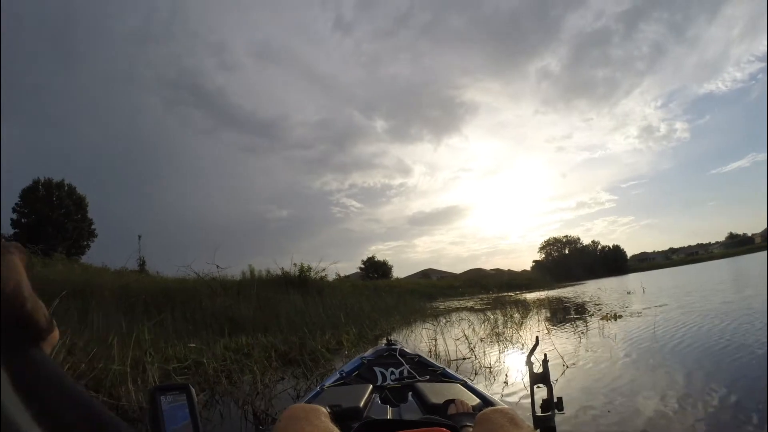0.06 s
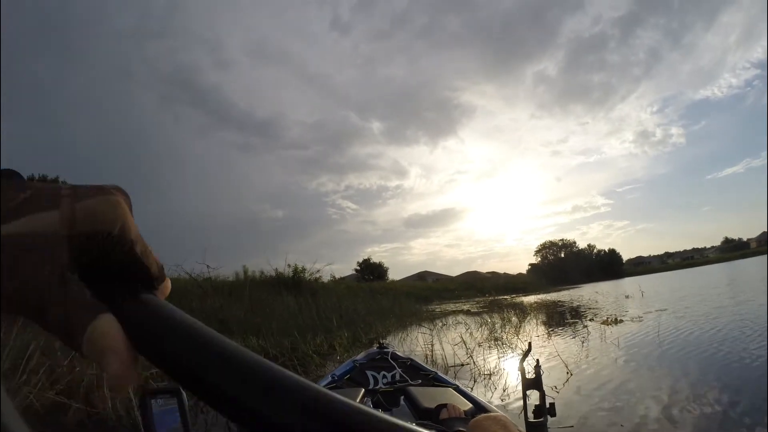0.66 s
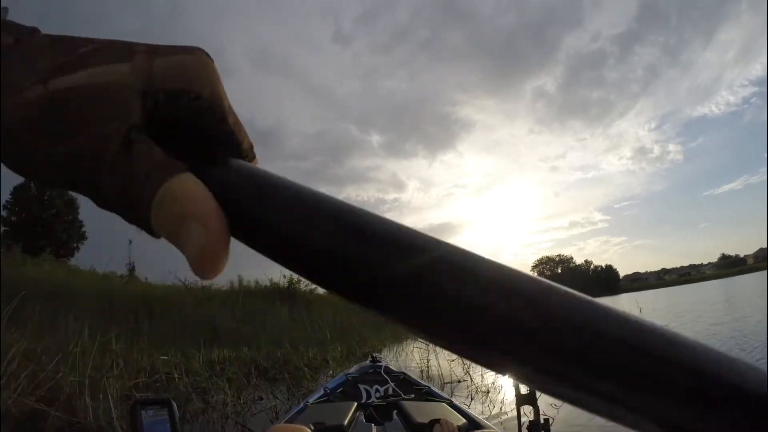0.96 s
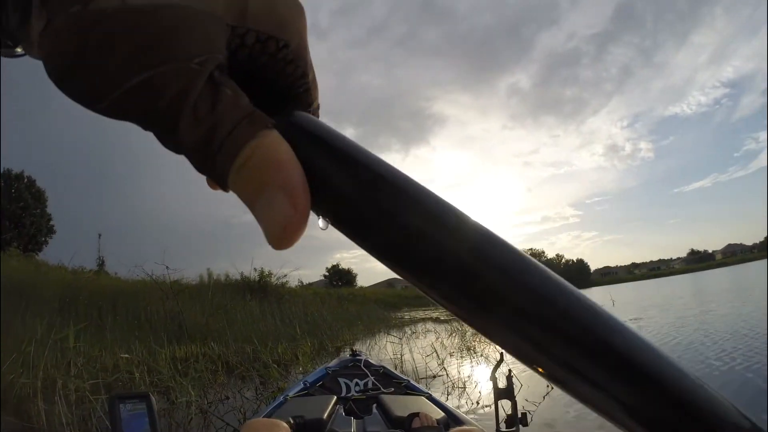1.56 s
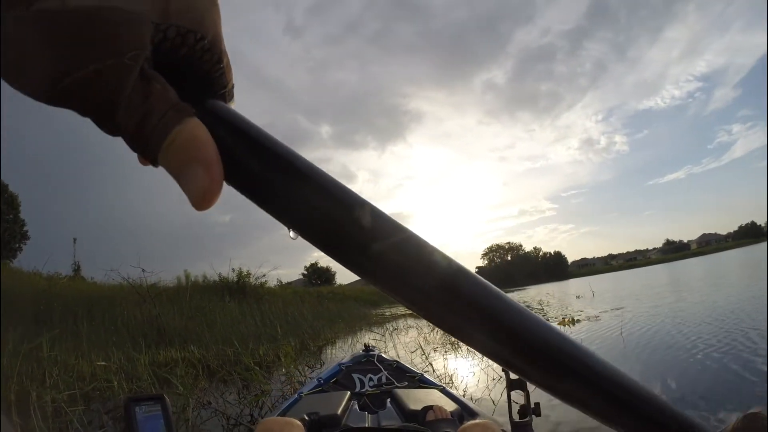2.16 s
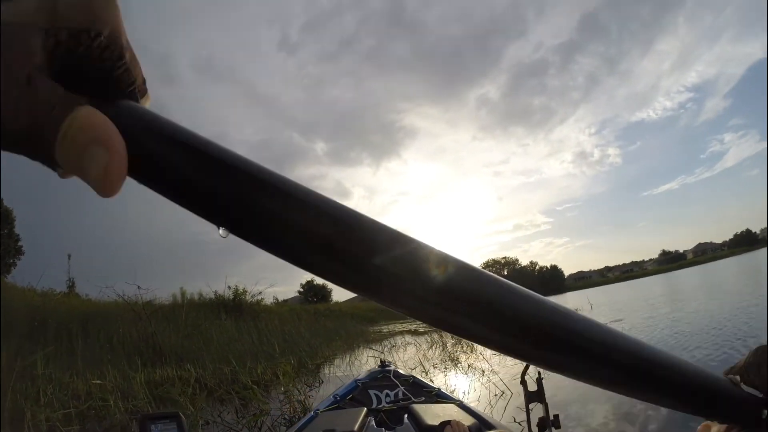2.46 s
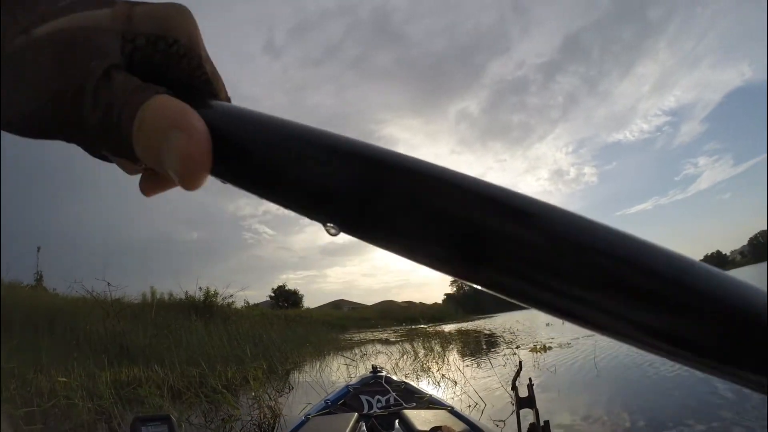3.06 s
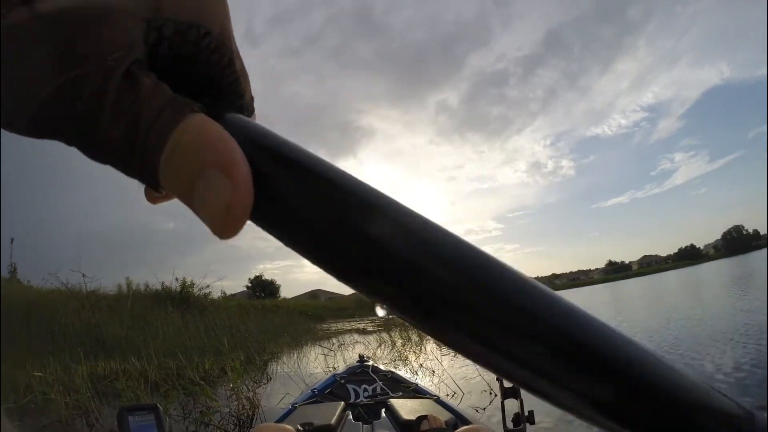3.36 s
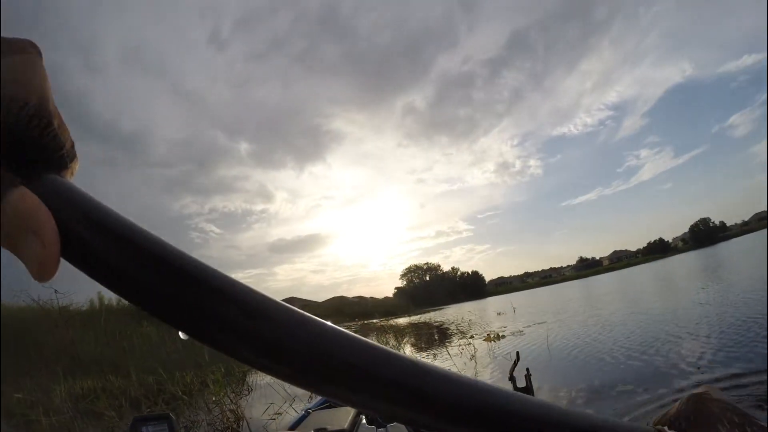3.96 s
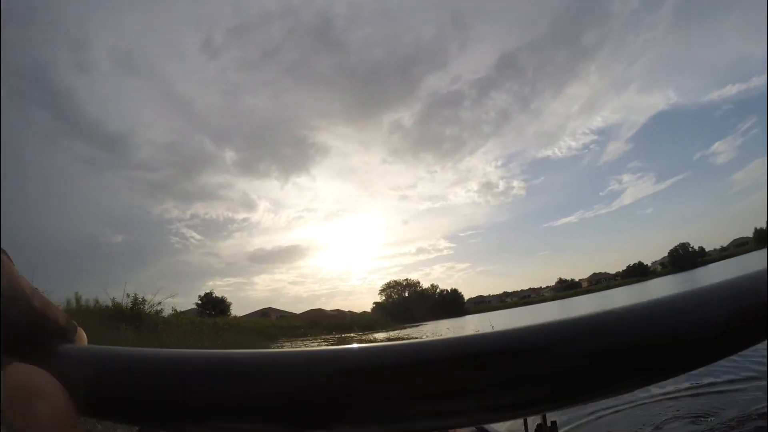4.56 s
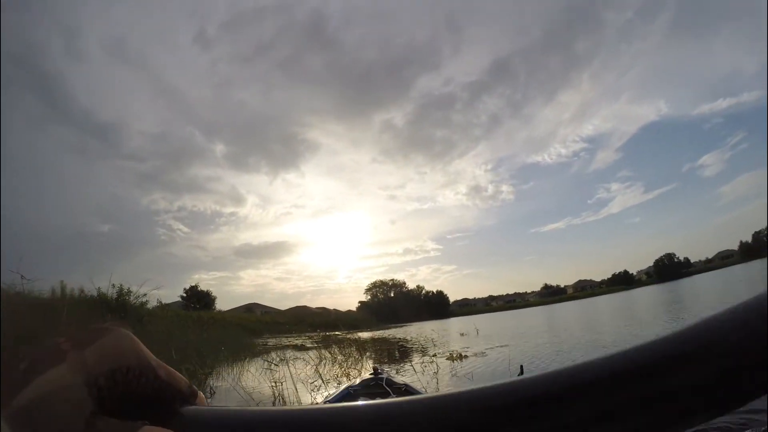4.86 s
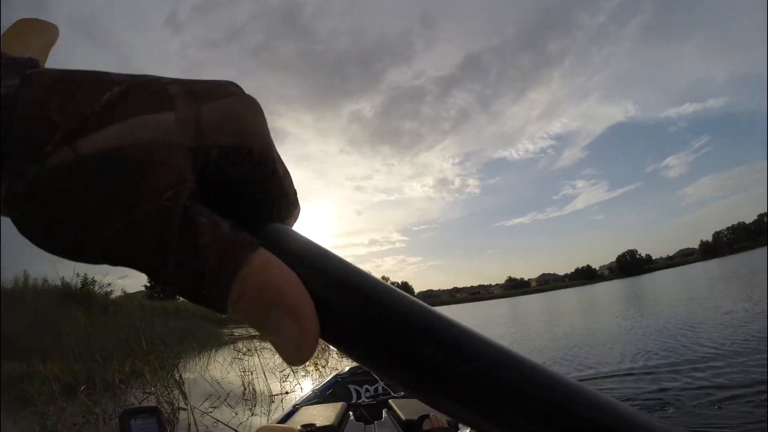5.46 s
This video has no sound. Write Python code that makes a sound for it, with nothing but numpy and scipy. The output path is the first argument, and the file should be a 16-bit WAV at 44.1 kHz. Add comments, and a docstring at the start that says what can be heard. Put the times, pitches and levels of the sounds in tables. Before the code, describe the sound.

Light knocks on a plastic kayak, then paddle strokes plop, gurgle and splash close by over a soft rumble of wind.

```python
"""A kayak paddle dips and pulls through a quiet pond, churning up bubbles, gulping eddies and spray.
Each bubble is a pocket of air that rings like a tiny bell, and drops fall from the blade between strokes.
The paddle knocks lightly on the plastic hull, a sleeve rustles and a strap rubs. It is all heard from
a small waterproof microphone on the paddler's chest, over a soft rumble of air."""
import sys
import numpy as np
from scipy import signal
from scipy.fft import rfft, irfft
from scipy.io import wavfile
from scipy.ndimage import uniform_filter1d

SR = 44100
rng = np.random.default_rng(int(sys.argv[2]) if len(sys.argv) > 2 else 0)


def unload_wav(signal):
    """Save mono or channel-first audio to the path in sys.argv[1] as 16-bit WAV at rate SR, clipped to [-1, 1]."""
    wavfile.write(
        sys.argv[1],
        SR,
        np.round(np.clip(np.atleast_2d(signal).T, -1, 1) * 32767).astype(np.int16),
    )


N = 247842
TIME = np.arange(N) / SR
AGE = TIME[:SR // 6]  # seconds since the start of one short sound

# paddle strokes, timed from when the blade catches the water: catch_s, sunk_after_s, pull_s, level_db
PADDLE_STROKES = [(2.39, 0.56, .52, -37), (3.789, 0.011, 0.52, -34), (5.34, 0.014, 0.04, -42)]
# the tone of splashing water: frequency_hz, gain_db
WATER_TONE = [(100, -48), (200, -4), (320, -7), (520, -3.5), (800, -3.5), (1150, 1), (1450, -5.5),
              (1750, -16), (2100, -19), (2600, -15.5), (3200, -21), (5500, -36.5), (7500, -33),
              (15000, -44)]


def undb(db):
    """Turn decibels into a gain to multiply by."""
    return 10 ** (np.asarray(db) / 20)


def unit(x):
    """Scale a signal to an average (rms) level of 1."""
    return x / np.sqrt(np.mean(x ** 2))


def add(track, start_s, sound):
    """Mix a short sound into a track."""
    start = int(np.clip(start_s * SR, 0, N - 1))
    track[start:start + len(sound)] += sound[:N - start]


def colour(x, points, size=4096):
    """Shape the tone with (frequency_hz, gain_db) points, keeping sudden starts sharp."""
    hz, db = np.transpose(points)
    grid_hz = np.maximum(np.arange(size // 2 + 1) * SR / size, 1)
    cepstrum = irfft(np.log(undb(np.interp(np.log(grid_hz), np.log(hz), db))))
    # make the filter ring only after a sound, never before it
    cepstrum[1:size // 2] *= 2
    cepstrum[size // 2 + 1:] = 0
    return signal.fftconvolve(x, irfft(np.exp(rfft(cepstrum))))[:N]


def wander(rate_hz):
    """A smooth random drift, about 1 in size."""
    hold = max(int(SR / rate_hz), 1)
    steps = np.repeat(rng.standard_normal(N // hold + 1), hold)
    return unit(uniform_filter1d(steps, hold)[:N])


def tone(hz):
    """A pure note that follows a changing pitch."""
    return np.sin(2 * np.pi * np.cumsum(np.minimum(hz, SR / 3)) / SR)


def burst(decay_s):
    """Noise that starts at once and dies away."""
    return np.exp(-AGE / decay_s) * rng.standard_normal(len(AGE))


def swells(rows):
    """A gain that rises and falls smoothly for each row: peak_s, half_length_s, level_db."""
    return sum(undb(db) * np.exp(-((TIME - peak_s) / half_s) ** 2) for peak_s, half_s, db in rows)


def ringing_note(hz, swell_s, ring_s, octaves_per_s):
    """A note that swells, glides and fades by 60 dB over ring_s, as a bubble does."""
    t = AGE[:int((swell_s + ring_s) * SR) + 2]
    swell = np.sin(np.pi / 2 * np.minimum(t / swell_s, 1)) ** 2
    fade = np.exp(-np.log(1000) * np.maximum(t - swell_s, 0) / ring_s)
    return swell * fade * tone(hz * 2 ** (octaves_per_s * t))


def bubble_cloud(low_hz, high_hz, cycles, glide_octaves, scatter_db, count):
    """Many small bubbles of random size and strength; each rings for roughly `cycles` vibrations."""
    out = np.zeros(N)
    for when, pitch, life, bend, force in rng.random((count, 5)):
        hz = low_hz * (high_hz / low_hz) ** pitch
        ring_s = cycles * (.5 + life) / hz
        bubble = ringing_note(hz, 1 / hz, ring_s, glide_octaves * bend / ring_s)
        add(out, when * N / SR, undb(scatter_db * force ** 2) * hz * bubble)
    return unit(out)


def breeze(level_db=-49, sway_db=1.5):
    """Light wind rumbles on the microphone's case, over a faint hiss."""
    # the tone of the wind: frequency_hz, gain_db
    wind_tone = [(15, -8), (35, -1.5), (60, 2.5), (110, -1.5), (230, -1.5), (330, -9), (450, -16),
                 (800, -16), (1250, -23.5), (2000, -25), (3300, -31.5), (9000, -37.5), (12000, -43.5),
                 (15500, -51)]
    rumble = unit(colour(rng.standard_normal(N), wind_tone))
    return rumble * undb(level_db + sway_db * wander(5.3))


def whine(pulse_hz=29.97, waver=0.003):
    """The electronics give off a thin, pulsing whine."""
    # its two high notes: pitch_hz, level_db
    notes = [(9860, -89), (11270, -86.5)]
    pulse = 1 + .7 * np.sin(2 * np.pi * pulse_hz * TIME)
    return sum(undb(db) * unit(pulse * tone(hz * (1 + waver * wander(200)))) for hz, db in notes)


def sleeve_rustle(still_db=-62.5, paddling_db=-54.5, paddling_s=2.1, pickup_s=0.43):
    """Cloth fibres catch and slip as the arm moves; once paddling starts, the sleeve never rests."""
    # the tone of the cloth: frequency_hz, gain_db
    cloth_tone = [(150, -16), (350, -1.5), (700, 1.5), (1200, 6), (1700, -1), (2200, -6), (2800, -11),
                  (3500, -15.5), (5000, -19), (6000, -21.5), (7200, -28), (9800, -29.5), (15000, -44)]
    # arm movements: peak_s, half_length_s, level_db
    arm_swings = [(.14, 0.069, -55), (.37, 0.094, -47), (.56, 0.074, -48), (.76, 0.016, -52),
                  (1.045, 0.028, -60), (1.39, 0.12, -54.5), (3.46, 0.034, -47.5), (4.92, 0.12, -62)]
    fibres = rng.standard_normal(N) * undb(3 * wander(400) + wander(56))
    steady = undb(np.interp(TIME, [paddling_s - pickup_s, paddling_s], [still_db, paddling_db]))
    return unit(colour(fibres, cloth_tone)) * (steady + undb(-1) * swells(arm_swings))


def sleeve_swishes():
    """Smooth fabric sliding on fabric gives a soft, high hiss."""
    # fast sweeps of the sleeve: peak_s, half_length_s, level_db
    sweeps = [(0.57, 0.056, -65), (1.28, .03, -66), (3.447, 0.13, -70), (5.22, 0.1, -66.5)]
    hiss_tone = [(1500, -19), (4000, -5), (5800, 5), (7500, -7), (11000, -5), (15000, -18)]
    hiss = rng.standard_normal(N) * undb(2.3 * wander(250))
    return swells(sweeps) * unit(colour(hiss, hiss_tone))


def strap_rubs(grain_db=2, release_s=0.046):
    """A strap slips, drags over the microphone's hollow case and comes to rest."""
    # slips of the strap: start_s, length_s, level_db, swell_s
    slips = [(0.141, 0.081, -49.5, 0.005), (0.782, 0.068, -48, 0.0028), (0.827, 0.17, -49, 0.027),
             (1.159, 0.066, -48, .003), (1.211, 0.15, -49, 0.04)]
    # the tone of the case: frequency_hz, gain_db
    case_tone = [(200, -17), (450, -2), (800, -7), (1250, 2), (1550, -3.5), (1900, -7), (2250, -7),
                 (2800, -5), (3250, -17), (5200, -22), (7000, -31), (15000, -40)]
    drag = np.zeros(N)
    for start_s, length_s, db, swell_s in slips:
        t = AGE[AGE < length_s]
        shape = np.minimum(t / swell_s, 1) * np.minimum((length_s - t) / release_s, 1)
        add(drag, start_s, undb(db) * shape)
    rasp = rng.standard_normal(N) * undb(grain_db * wander(600))
    return drag * unit(colour(rasp, case_tone))


def vest_bump(start_s=.597, level_db=-30):
    """An arm lands on the padded life vest with a low thud."""
    out = np.zeros(N)
    add(out, start_s, undb(level_db) * ringing_note(hz=68, swell_s=0.0036, ring_s=0.05, octaves_per_s=0))
    return out


def hull_knocks(crack_db=-15, crack_s=0.0052):
    """Each knock rings the hull's notes near its own pitch; a hand or the water cuts some short."""
    # knocks on the boat: start_s, level_db, centre_hz, width_octaves, ring_scale (multiplies ring_s)
    blows = [(.153, -32, 720, 0.44, 3.9), (0.2664, -32, 1170, 0.85, 1.5), (0.2789, -31, 1860, 3.6, 0.17),
             (0.356, -24, 1230, 1.08, 0.9), (0.4504, -24.5, 1290, 1.25, 1.35), (0.457, -31.5, 684, 0.31, 1),
             (1.512, -41, 2000, 0.71, 0.45), (0.583, -30, 2000, 2, 1.6), (0.59, -30, 1310, 3.4, 0.73),
             (0.592, -26.5, 950, 0.98, 1.8), (0.6458, -16.5, 748, 0.43, 0.57),
             (1.034, -41, 1290, 0.66, 0.77), (1.061, -47, 2000, 3.6, 1.2), (1.162, -31.5, 870, 1.3, 0.32),
             (3.1787, -17, 623, 2.3, 0.97), (3.1996, -33.5, 1250, 2.4, 0.77), (4.206, -26, 1760, 0.89, .4)]
    # the hull's natural notes: pitch_hz, level_db, ring_s
    hull_notes = [(483, 10, 0.034), (662, 1, 0.037), (884, 7.5, 0.015), (1182, 6.5, 0.03),
                  (1520, -2, 0.022), (1754, 6, 0.013), (2050, -8.5, 0.071), (2657, -1, 0.03),
                  (3720, -4, 0.014), (5040, -19, .01), (6300, -32, .012)]
    rings, cracks = np.zeros(N), np.zeros(N)
    hz, note_db, ring_s = np.transpose(hull_notes)[:, :, None]
    direction = (-1) ** np.arange(len(hz))[:, None]  # neighbouring notes swing against each other
    for start_s, db, centre_hz, width, ring_scale in blows:
        strength = undb(note_db) / (1 + (np.log2(hz / centre_hz) / width) ** 2) ** 2
        detune = 1 + 0.066 * rng.standard_normal(hz.shape)  # each spot rings a little differently
        fade = np.exp(-np.log(1000) * AGE / (ring_s * ring_scale))
        body = (strength * direction * np.sin(2 * np.pi * hz * detune * AGE) * fade).sum(axis=0)
        add(rings, start_s, undb(db) * body / np.abs(body).max())
        # a hard knock spans more octaves and also cracks
        add(cracks, start_s, undb(db + crack_db) * width ** 2 * burst(crack_s * ring_scale))
    crack_tone = [(200, -7.5), (1500, 6.5), (3000, -22.5), (6000, -15), (15000, -37.5)]
    return rings + colour(cracks, crack_tone)


def deck_ticks(gain_db=-4):
    """Tiny droplets tick on the deck close by."""
    # droplets landing: start_s, level_db
    droplets = [(0.587, -38), (0.9503, -38), (1.062, -39), (2.6743, -34), (3.0157, -29.5), (3.18, -32.5),
                (3.508, -38), (4.033, -37), (4.2386, -31), (4.671, -38.5)]
    ticks = np.zeros(N)
    for start_s, db in droplets:
        add(ticks, start_s, undb(db + gain_db) * burst(decay_s=0.0014))
    return colour(ticks, [(800, 15), (3500, 2), (5600, -6.5), (7300, -3), (9800, -0.5), (15000, -33)])


def blade_effort(build_db_per_s=130, ease_db_per_s=8.5, lift_db_per_s=57):
    """How hard the blade pushes, as a gain: it builds, eases during the pull and dies as it lifts."""
    gain = np.zeros(N)
    for catch_s, _, pull_s, db in PADDLE_STROKES:
        t = TIME - catch_s
        build_db = build_db_per_s * np.minimum(t, 0)
        ease_db = ease_db_per_s * np.clip(t, 0, pull_s)
        lift_db = lift_db_per_s * np.maximum(t - pull_s, 0)
        gain += undb(db + build_db - ease_db - lift_db)
    return gain


def blade_depth(sink_s=0.44, rise_s=.22):
    """How deep the blade sits during the strokes, from 0 (in the air) to 1 (fully under)."""
    depth = np.zeros(N)
    for catch_s, sunk_s, pull_s, _ in PADDLE_STROKES:
        depth += np.interp(TIME - catch_s, [sunk_s - sink_s, sunk_s, pull_s, pull_s + rise_s], [0, 1, 1, 0])
    return np.clip(depth, 0, 1)


def wake(gain_db=-10, spread_s=0.5):
    """Medium bubbles chirp upward around each stroke and linger after it."""
    chirps = bubble_cloud(758, 1633, cycles=58.6, glide_octaves=1.34, scatter_db=5.5, count=320)
    return undb(gain_db) * chirps * uniform_filter1d(blade_effort(), int(spread_s * SR))


def spray(ping_db=-22, mist_db=-30):
    """Sheets of water tear with a bright crackle; droplets and mist ping on the pond during the pull."""
    # the blade cutting the surface: start_s, level_db, decay_s
    cuts = [(2.424, -41, .0045), (2.53, -41, .004), (2.573, -44, 0.0055), (3.272, -45.5, 0.015),
            (3.78, -43.5, .018), (3.83, -46, 0.019), (4.059, -40, .004), (4.457, -43, 0.006),
            (5.3074, -41, .005), (5.34, -44.5, .008), (5.381, -46, .007)]
    spray_tone = [(500, -1), (1500, 10), (2400, 13), (3200, 4), (4200, -3.5), (5800, -6.5),
                  (7200, -17), (10000, -21), (15000, -43)]
    loudness = np.zeros(N)
    for start_s, db, decay_s in cuts:
        add(loudness, start_s, undb(db) * np.exp(-AGE / decay_s))
    crackle = loudness * rng.standard_normal(N) * undb(2.55 * wander(1500))
    pings = bubble_cloud(2190, 2700, cycles=46, glide_octaves=0.24, scatter_db=4, count=170)
    mist = bubble_cloud(3800, 6300, cycles=55, glide_octaves=.1, scatter_db=7, count=150)
    return colour(crackle, spray_tone) + (undb(ping_db) * pings + undb(mist_db) * mist) * blade_effort()


def gulps(fade_db=7, edge_s=0.0019):
    """Hollows close behind the blade; most wobbling notes whip upward as the hollow shrinks."""
    # swirls: start_s, length_s, start_hz, end_hz, level_db, lateness (1 glides evenly, more glides late)
    eddies = [(2.533, 0.053, 547, 1510, -33, 3.2), (2.669, 0.031, 716, 1860, -33.5, 1.01),
              (2.681, 0.067, 427, 902, -32, 1.8), (2.785, 0.08, 376, 275, -42.5, 0.65),
              (2.877, 0.059, 500, 1450, -41, 4), (3.643, 0.022, 760, 1190, -39, 0.88),
              (3.89, 0.13, 227.3, 549, -36.5, 1.2)]
    out = np.zeros(N)
    wobble = 1 + .025 * wander(150)
    for start_s, length_s, start_hz, end_hz, db, lateness in eddies:
        t = AGE[AGE < length_s]
        progress = t / length_s
        soft_edges = np.minimum(np.minimum(t, length_s - t) / edge_s, 1)
        hz = start_hz * (end_hz / start_hz) ** (progress ** lateness)
        hz *= np.interp(start_s + t, TIME, wobble)
        add(out, start_s, undb(db - fade_db * progress) * soft_edges * tone(hz))
    return out * undb(1.8 * wander(140))


def plops(drop_swell_s=0.001274, bubble_swell_s=0.00424):
    """Air pockets pinch off and ring, and the water slaps shut around each with a short splash."""
    # the clearest bubbles and drops: peak_s, pitch_hz, level_db, ring_s, rise_octaves_per_s
    air_pockets = [(1.6075, 848, -29.5, 0.011, -3), (1.657, 2090, -45, .024, -6),
                   (1.823, 4700, -51, 0.011, 12), (2.053, 1820, -43, .013, 12),
                   (2.2224, 748, -35.5, 0.12, 10), (2.2245, 1275, -26.5, 0.027, 14.5),
                   (2.2905, 1300, -26, .016, 25), (2.373, 1104, -30, 0.089, 1),
                   (2.388, 628, -30.5, .065, -1), (2.395, 3930, -43, 0.012, 12),
                   (2.447, 1090, -27, .011, 0), (2.4661, 1150, -21.5, 0.013, 53),
                   (2.4869, 1344, -22.5, 0.026, 10), (2.6238, 1040, -20, 0.0039, 0),
                   (2.6517, 1130, -20.5, 0.0062, 0), (2.654, 421, -24.5, 0.11, 12.5),
                   (2.7374, 2560, -28.5, 0.02, -2), (2.772, 443, -34, 0.1, 11.5),
                   (2.831, 1580, -34.5, 0.096, 5), (2.85, 1090, -28.5, 0.064, 8.5),
                   (2.8723, 885, -32, 0.027, 56), (2.9966, 1020, -32, .035, -1),
                   (3.013, 1030, -26, 0.055, -5), (3.0751, 1080, -27, 0.031, -1),
                   (3.2792, 1073, -23.5, 0.039, -7.5), (3.3318, 1003, -21, 0.039, 24.5),
                   (3.5285, 1017, -31, .049, 10.5), (3.545, 1163, -31, 0.029, 26),
                   (3.587, 1620, -31, 0.024, 10), (3.697, 1235, -29.5, 0.038, 17),
                   (3.768, 383, -31.5, 0.1, 0.5), (3.7923, 1077, -26, 0.055, 16.5),
                   (3.797, 2180, -36, .02, 0), (3.805, 5500, -43, 0.012, 12), (3.808, 2230, -29, 0.016, -4),
                   (3.83, 1190, -22, 0.041, 0), (3.8303, 2230, -27.5, 0.024, 3.5),
                   (3.8436, 535, -28.5, 0.064, 6.5), (3.9045, 977, -29, .09, 15),
                   (3.9226, 630, -23, 0.0154, 3), (3.9258, 1068, -21.5, 0.054, 2),
                   (3.9874, 1225, -20.5, 0.057, 16.5), (4.0086, 1140, -18.5, 0.011, 22),
                   (4.035, 628, -20, .033, 17), (4.0377, 312, -29, 0.12, -1), (4.131, 2220, -33.5, .021, 1),
                   (4.2304, 1043, -20.5, 0.014, 74), (4.231, 780, -29.5, 0.063, -3.5),
                   (4.4066, 496, -35.5, 0.14, 7), (4.417, 1086, -27, 0.011, 50),
                   (4.483, 1140, -28.5, 0.022, 26), (4.516, 986, -30.5, 0.032, 51.5),
                   (4.543, 1470, -37.5, .04, 10), (4.667, 2590, -49, 0.012, 12),
                   (4.7373, 1430, -30.5, 0.023, -2), (5.097, 2740, -49, 0.015, 12),
                   (5.3098, 970, -19, .011, 66), (5.3095, 4520, -42, 0.01, 2),
                   (5.3279, 1177, -26.5, 0.009, 73), (5.352, 2380, -35.5, .008, 0),
                   (5.383, 1183, -24, 0.039, 18), (5.3911, 964, -15.5, 0.0041, 0)]
    rings, slaps = np.zeros(N), np.zeros(N)
    for peak_s, hz, db, ring_s, rise in air_pockets:
        if rise > 2:  # a rising bubble starts more gently than a drop
            swell_s, slap_db = min(bubble_swell_s, 0.173 * ring_s), -5
        else:
            swell_s, slap_db = drop_swell_s, 0
        add(rings, peak_s - swell_s, undb(db) * ringing_note(hz, swell_s, ring_s, rise))
        add(slaps, peak_s - swell_s / 2, undb(db + slap_db) * burst(decay_s=0.0035))
    return rings + colour(slaps, WATER_TONE)


def paddle_churn(gurgle_db=-2, foam_db=-11, fizz_db=-27, deep_hz=520):
    """Water folds around the blade: a gurgle of bubbles, a little foam and a thin, bright fizz."""
    # surges off the blade or against the hull: peak_s, half_length_s, level_db
    surges = [(2.46, 0.028, -39.5), (2.85, .05, -47.5), (3.325, 0.045, -36), (3.54, 0.063, -40.5),
              (4.97, 0.018, -46), (5.195, 0.024, -40.5), (5.395, 0.023, -38)]
    gurgle = bubble_cloud(260.4, 2346, cycles=31, glide_octaves=0.36, scatter_db=10, count=3000)
    foam = rng.standard_normal(N) * undb(5.3 * wander(350))
    fizz = bubble_cloud(2300, 6660, cycles=110, glide_octaves=.15, scatter_db=-1, count=380)
    layers = [(gurgle, gurgle_db), (foam, foam_db), (fizz, fizz_db)]
    water = sum(undb(db) * unit(colour(layer, WATER_TONE)) for layer, db in layers)
    # only a deep blade traps the big, low-pitched pockets of air
    lows = signal.sosfiltfilt(signal.butter(2, deep_hz, fs=SR, output="sos"), water)
    water -= (1 - blade_depth()) * lows
    return water * (blade_effort() + swells(surges))


def scene():
    """Mix water, boat, paddler and air into one channel."""
    water = plops() + gulps() + paddle_churn() + wake() + spray() + deck_ticks()
    paddler = vest_bump() + strap_rubs() + sleeve_rustle() + sleeve_swishes()
    return (water + hull_knocks() + paddler + breeze() + whine())[None]


def record(dry):
    """Cut away the very highest treble."""
    top_hz = 15300
    return signal.sosfilt(signal.ellip(8, .2, 70, top_hz, fs=SR, output="sos"), dry)


dry = scene()
out = record(dry)
unload_wav(out)
```